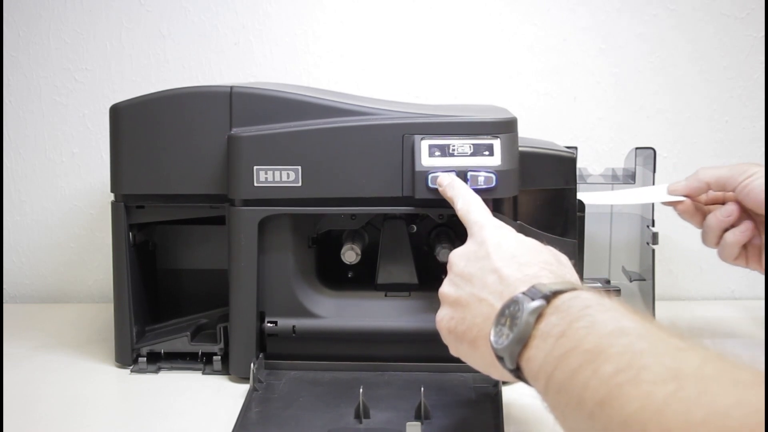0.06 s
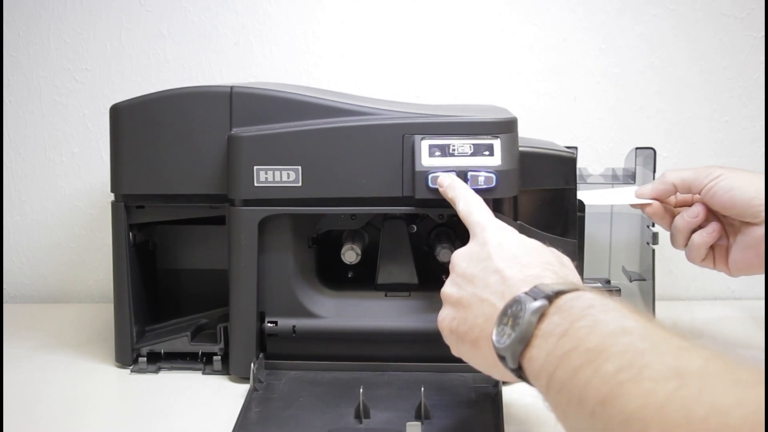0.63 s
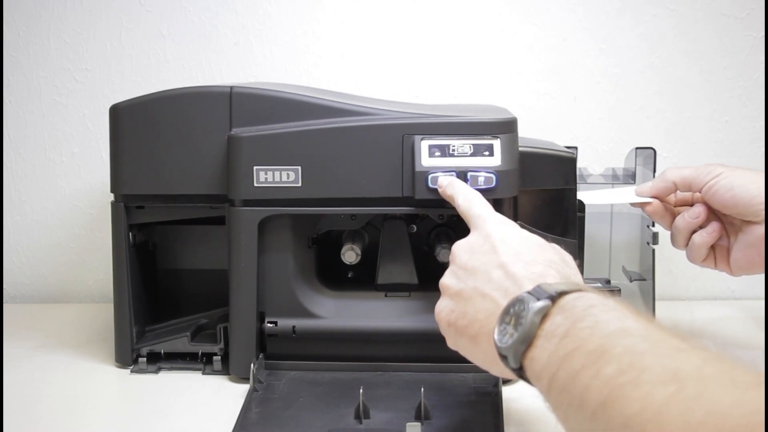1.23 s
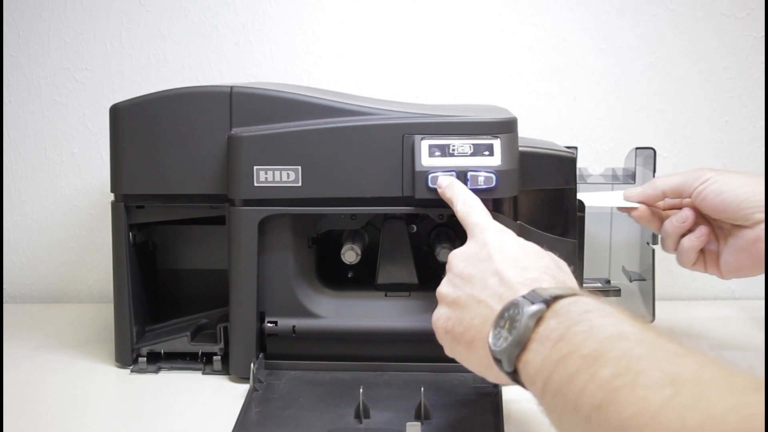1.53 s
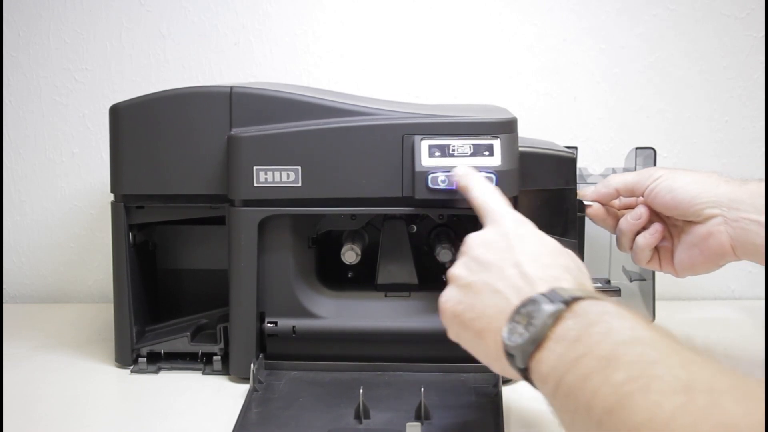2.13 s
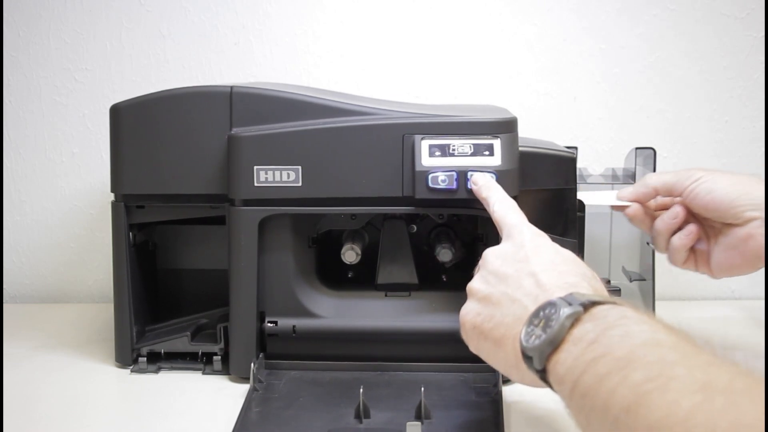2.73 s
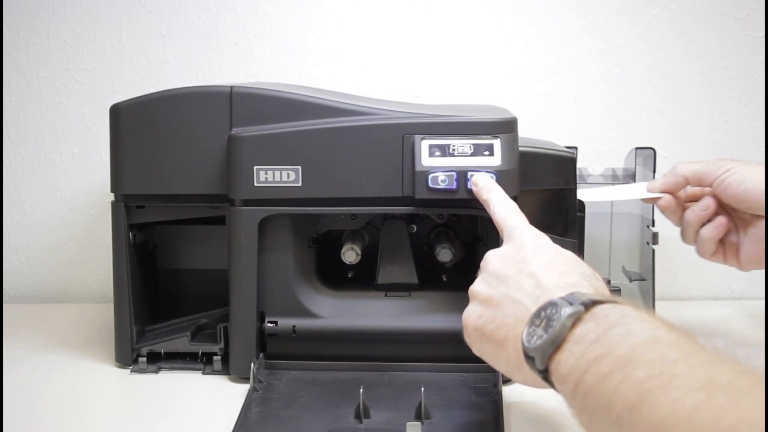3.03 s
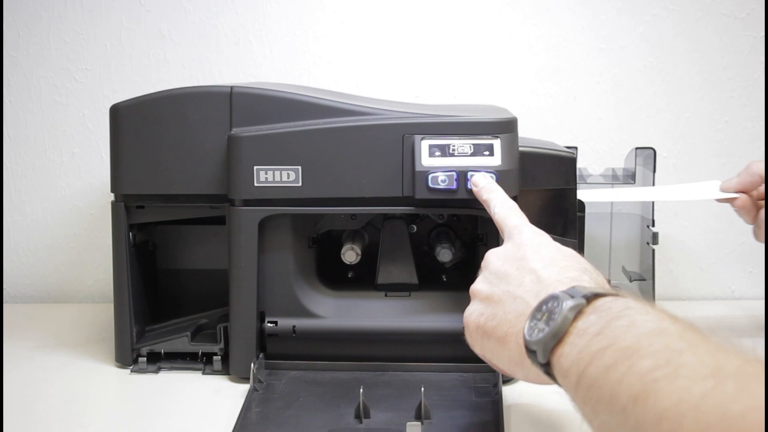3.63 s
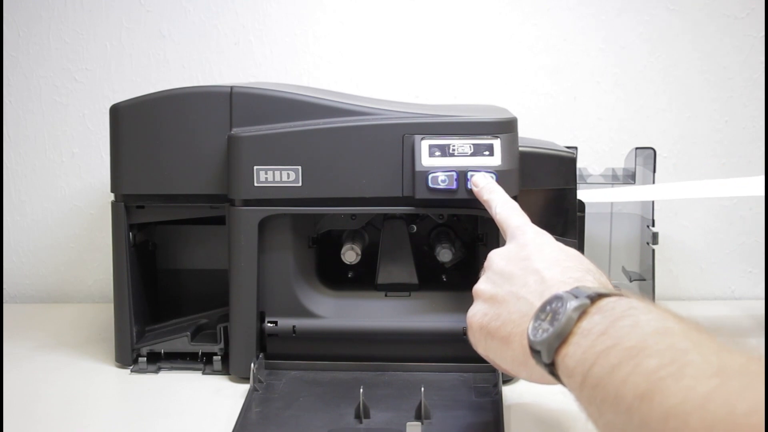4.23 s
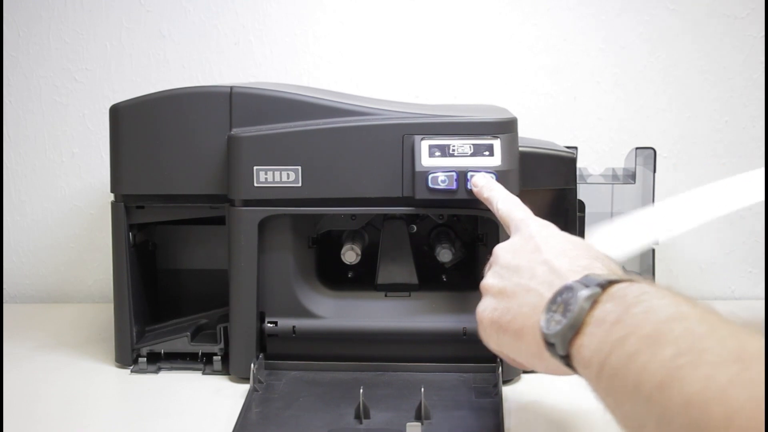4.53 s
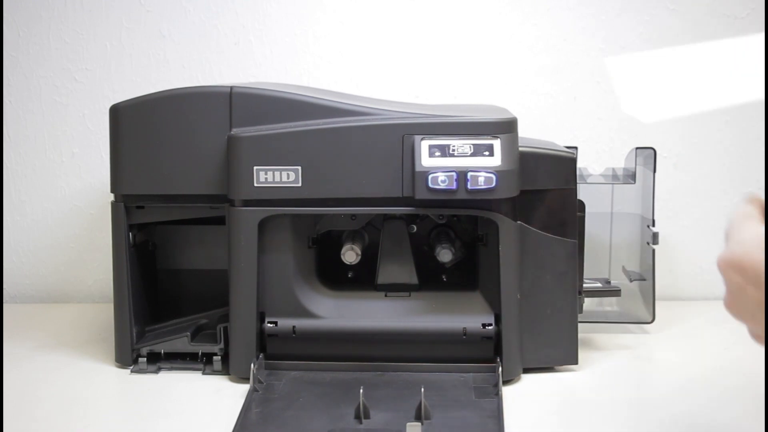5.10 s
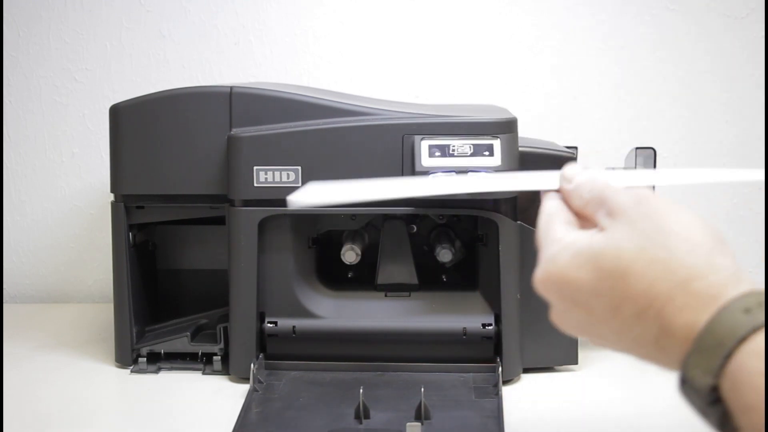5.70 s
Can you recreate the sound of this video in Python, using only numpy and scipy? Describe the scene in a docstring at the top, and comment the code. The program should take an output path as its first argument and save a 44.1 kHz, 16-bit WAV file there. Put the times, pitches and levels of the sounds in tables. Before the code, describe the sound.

A card printer's motor whines over churring gears in three short runs, with plastic clicks and a few knocks as the card comes out.

```python
"""A stepper motor whines over churring gears and rubbing rollers: a desktop card printer, close to the
microphone in a small quiet room. It feeds a cleaning card in three short runs, two inward and one
outward, with small clicks around the starts and stops. Each ramp of the motor shakes the plastic
housing and clatters the gears. At the end the card knocks free of the rollers and is lifted away."""
import sys
import numpy as np
from scipy import signal
from scipy.fft import rfft, irfft
from scipy.io import wavfile
from scipy.ndimage import uniform_filter1d

SR = 44100
rng = np.random.default_rng(int(sys.argv[2]) if len(sys.argv) > 2 else 0)


def dump(signal):
    """Clip the signal to [-1, 1] and save it as 16-bit WAV at the path in sys.argv[1]."""
    limited = np.clip(np.atleast_2d(signal).T, -1, 1)
    pcm = np.round(limited * 32767).astype(np.int16)
    wavfile.write(sys.argv[1], SR, pcm)


N = 254016
T = np.arange(N) / SR

FULL_STEP_HZ, FIRST_STEP_HZ = 2439, 520
# motor runs, the first already under way: start_s, stop_s, outward (0 or 1)
MOTOR_RUNS = [(-1, 1.087, 0), (1.325, 1.996, 0), (2.374, 4.524, 1)]


def amp(db):
    """Decibels to gain."""
    return 10 ** (np.asarray(db) / 20)


def unit(x):
    """Scale to rms 1."""
    return x / np.sqrt(np.mean(np.abs(x) ** 2) + 1e-20)


def walk(hz):
    """Smooth random drift at rms 1 that changes about hz times a second."""
    rolloff = np.exp(-(np.fft.rfftfreq(N, 1 / SR) / hz) ** 2)
    return unit(irfft(rfft(rng.standard_normal(N)) * rolloff, N))


def colour(x, points):
    """Filter x by a curve of (hz, db) points, at rms 1."""
    hz, db = np.transpose(points)
    curve_db = np.interp(np.log(np.fft.rfftfreq(N, 1 / SR) + 1), np.log(hz), db)
    return unit(irfft(rfft(x) * amp(curve_db), N))


def band(x, low_hz, high_hz):
    """Band-pass with 12 dB per octave skirts."""
    edges = [low_hz, min(max(high_hz, low_hz + 30), SR / 2 - 100)]
    return signal.sosfilt(signal.butter(2, edges, "band", fs=SR, output="sos"), x)


def convolve(x, response):
    """Pass x through a response scaled to energy 1."""
    return signal.fftconvolve(x, response / np.linalg.norm(response))[:N]


def grit(spread_db):
    """Dense tiny contacts of uneven size."""
    return unit(rng.standard_normal(N) * amp(spread_db * rng.standard_normal(N)))


def drive(ramp_s=.047):
    """Motor state: power on, speed 0-1 along short ramps, outward flag, steps taken."""
    on, speed, outward = np.zeros((3, N))
    for start, stop, direction in MOTOR_RUNS:
        inside = (T >= start) & (T < stop)
        on += inside
        speed += np.clip(np.minimum(T - start, stop - T) / ramp_s, 0, 1) ** 1.3
        outward += inside * direction
    steps = np.cumsum(on * (FIRST_STEP_HZ + (FULL_STEP_HZ - FIRST_STEP_HZ) * speed)) / SR
    return uniform_filter1d(on, size=220), speed, outward, steps


def whine(steps, outward, drag, waver_db=.8, surge_db=.7, flutter_rad=.16, drag_db=-1.5):
    """Trembling partials locked to the motor's steps; the step tone weakens when the card drags."""
    # each direction's partials, mostly multiples of the four-step coil cycle: pitch_hz, level_db
    inward_partials = [(1830, -84), (2250, -65.5), (2439, -50.5), (2627, -73), (4269, -74), (4877, -68.5),
                       (6099, -76.5), (6708, -81), (7316, -67.5), (7924, -79), (8538, -85), (9146, -76.5),
                       (9755, -74), (10368, -92), (10977, -88), (12193, -87), (13415, -98), (14023, -88),
                       (14632, -100), (15246, -83)]
    outward_partials = [(2035, -74), (2245, -104), (2439, -50), (2632, -80), (3138, -82), (3752, -87.5),
                        (4269, -68), (4877, -59), (5486, -80.5), (7316, -68.5), (7924, -86), (8538, -84),
                        (9146, -72), (9755, -75), (10368, -88), (10977, -93), (11585, -89), (13415, -89),
                        (14632, -85), (15246, -95)]
    # trim on the step tone's octave: time_s, gain_db
    octave_trim = [(1.66, -1), (1.72, -4), (3.2, -4.5), (3.55, -.5)]
    octave_db = np.interp(T, *np.transpose(octave_trim))
    out = 0
    for gate, partials in (1 - outward, inward_partials), (outward, outward_partials):
        for hz, db in partials:
            order = hz / FULL_STEP_HZ
            is_step, is_octave = abs(order - 1) < .02, abs(order - 2) < .02
            phase = 2 * np.pi * (steps * order + rng.random()) + flutter_rad * walk(27)
            tremble_db = waver_db * walk(40) + surge_db * walk(2.5)
            level_db = db + tremble_db + is_step * drag * drag_db + is_octave * octave_db
            out = out + gate * amp(level_db) * np.sqrt(2) * np.sin(phase)
    return out


def gears(steps, outward, drag, level_db=-50, outward_db=1.5, drag_db=1.2, blur_hz=17, tooth_steps=20):
    """Loose plastic teeth: blurred tones that follow the motor, and churr that pulses as they mesh."""
    # gear tones at full speed: pitch_hz, relative_db
    gear_tones = [(124, -66.5), (191, -67.5), (254, -66), (298, -60.5), (360, -75.5), (435, -63),
                  (492, -67.5), (570, -63.5), (610, -59), (733, -58.5), (855, -62), (980, -57), (1185, -63),
                  (1360, -67), (1520, -88), (2900, -82), (3400, -73.5), (3690, -77)]
    # spectrum of the churr: frequency_hz, relative_db
    churr_spectrum = [(120, -47), (230, -7), (450, 3), (620, 0), (1000, 2), (1300, -3.5), (1700, -8.5),
                      (2300, -9), (3000, -22.5), (6000, -27.5), (15000, -53)]
    turn = 2 * np.pi * steps / FULL_STEP_HZ
    tones = sum(amp(db) * (walk(blur_hz) * np.sin(hz * turn) + walk(blur_hz) * np.cos(hz * turn))
                for hz, db in gear_tones)
    mesh = 1 + .082 * np.cos(2 * np.pi * steps / tooth_steps)
    churr = colour(grit(4.7) * mesh, churr_spectrum) * amp(walk(39))
    gain = amp(level_db + outward * outward_db + drag * drag_db)
    return gain * (amp(1.9) * unit(tones) / 2 + amp(-2) * churr)


def rollers(speed, outward, drag, level_db=-62, outward_db=4, drag_db=4):
    """Rollers rub the card, louder on the way out and when it drags."""
    # spectrum of the rub: frequency_hz, relative_db
    rub_spectrum = [(600, -44), (1500, 4.5), (2600, 1.5), (3600, 0), (5200, -8), (7500, -12.5),
                    (10000, -16), (12000, -29), (15500, -75)]
    gain = np.sqrt(speed) * amp(level_db + outward * outward_db + drag * drag_db)
    return gain * colour(grit(7.5), rub_spectrum)


def room_tone(air_db=-63, rise_s=4.5, rise_db=1.5, hum_gain_db=1, hum_end_s=2.93, hum_fade_s=.088):
    """Soft air noise, slightly louder from 4.5 s on, and a low hum that ends partway."""
    # spectrum of the air: frequency_hz, relative_db
    air_spectrum = [(15, -36), (35, -2.5), (55, -6.5), (90, -12.5), (125, -11.5), (250, -7.5), (450, -12.5),
                    (750, -12), (1500, -19.5), (2200, -24), (5500, -28), (15500, -36.5)]
    # low hum: pitch_hz, base_level_db
    hum_tones = [(53.8, -65)]
    air = colour(rng.standard_normal(N), air_spectrum)
    air *= amp(air_db + (T > rise_s) * rise_db + .5 * walk(8.2))
    hum = sum(amp(db + 1.6 * walk(1.8)) * np.sqrt(2) * np.sin(2 * np.pi * (hz * T + rng.random()))
              for hz, db in hum_tones)
    return air + amp(hum_gain_db) * hum * np.clip((hum_end_s - T) / hum_fade_s + .5, 0, 1)


def room(x, wet_db=-8, t60_s=.22):
    """The dull, short tail of a small room, reaching the microphone 4 ms late."""
    t = T[:SR // 2]
    tail = rng.standard_normal(len(t)) * np.exp(-np.log(1000) * t / t60_s) * (t > .004)
    return amp(wet_db) * band(convolve(x, tail), 200, 3800)


def housing(x, crack_db=-3, crack_s=.0095):
    """Ring the case: its main modes and a brief crack of countless higher ones."""
    # modes of the plastic case: pitch_hz, relative_db, t60_s
    modes = [(310, 3, .07), (430, -2.5, 0.083), (608, 1, 0.13), (710, -3, 0.03), (862, 0.5, 0.072),
             (992, 4.5, 0.034), (1418, -1, 0.029), (1626, -4.5, 0.022), (1910, -5.5, 0.022),
             (2255, 1, 0.038), (2834, -8.5, 0.028), (3810, -0.5, 0.011), (4470, -25, 0.076),
             (5540, -22, 0.012)]
    t = T[:SR // 5]
    ring = sum(amp(db - 60 * t / t60) * np.sin(2 * np.pi * hz * t + rng.uniform(0, 2 * np.pi))
               for hz, db, t60 in modes)
    crack = rng.standard_normal(len(t)) * np.exp(-t / crack_s)
    return convolve(x, unit(ring) + amp(crack_db) * unit(crack))


def blow(start_s, db, low_hz, high_hz, chatter_s, end_share=.15, uneven_db=4):
    """A chatter of contacts tapering to end_share; harder, smaller parts ring the case higher up."""
    ring = housing(signal.unit_impulse(SR // 5), crack_db=3.5, crack_s=.007)[:SR // 5]
    count = int(chatter_s * SR) + 2
    force, size = rng.standard_normal((SR // 10, 2))[:count].T
    contacts = force * amp(uneven_db * size) * np.linspace(1, end_share, len(force))
    sound = band(signal.fftconvolve(ring, contacts), low_hz, high_hz)
    sound = sound * amp(db) / np.std(sound[:count + SR // 200])
    sound = signal.sosfilt(signal.butter(2, 8000, fs=SR, output="sos"), sound)  # plastic damps the top
    return np.pad(sound, (int(start_s * SR), N))[:N]


def case_clicks():
    """Small clicks and ticks in the case around the motor's starts and stops."""
    # clicks and ticks: start_s, level_db, low_hz, high_hz, chatter_s
    clicks = [(1.008, -53.5, 1200, 9000, 0.0034), (1.257, -49.5, 686, 1530, 0.01),
              (1.297, -52, 500, 2700, 0.016), (1.932, -45.5, 860, 2050, 0.014),
              (2.005, -52.5, 497, 3000, 0.011), (2.2968, -41.5, 570, 7360, 0.0024),
              (2.310, -55, 1000, 1830, .019), (2.349, -57, 300, 1300, .022)]
    return sum(blow(*click) for click in clicks)


def scatter(x, decay_s):
    """Many short paths through the case: a ragged response that dies quickly."""
    t = T[:SR // 10]
    return convolve(x, rng.standard_normal(len(t)) * np.exp(-t / decay_s))


def judder(on, speed, steps, swing_db=-41, octave_db=-53, rotor_hz=900, rattle_db=-46, uneven_db=4):
    """On the ramps the step tone sweeps through the rotor's resonance, and jerks rattle the case."""
    slow = on * (1 - speed)
    ramping = on * np.minimum(10 * slow, 1)
    step_hz = FIRST_STEP_HZ + (FULL_STEP_HZ - FIRST_STEP_HZ) * speed
    phase = 2 * np.pi * steps + .8 * walk(300)
    resonance = 1 / np.hypot(1, 2 * (step_hz / rotor_hz - rotor_hz / step_hz))
    swing = amp(swing_db) * resonance * np.sin(phase)
    octave = amp(octave_db) * np.sqrt(speed) * np.sin(2 * phase)
    jerks = np.diff(np.floor(steps), prepend=0) * slow * amp(uneven_db * rng.standard_normal(N))
    rattle = amp(rattle_db) * unit(housing(band(jerks, 730, 4050))) * np.sqrt(np.mean(slow))
    sweep = scatter(ramping * (swing + octave), decay_s=.0044)
    return band(band(sweep, 270, 6100), 270, 6100) + rattle


def backlash(start_db=-40.5, outward_db=-4.5, stop_db=-44.5, start_chatter_s=.026, stop_chatter_s=.021):
    """Gear teeth clatter as they take up slack at each start, and more dully as the motor brakes."""
    out = 0
    for start, stop, outward in MOTOR_RUNS:
        if start > 0:
            db = start_db + outward * outward_db
            out += blow(start, db, 376, 3360, start_chatter_s, end_share=1)
        out += blow(stop - stop_chatter_s, stop_db, 630, 1510, stop_chatter_s, end_share=1)
    return out


def swishes_and_bumps():
    """The card swishes over rollers and fingers. Soft low bumps, then a long faint background rumble."""
    # swells of band noise: peak_s, level_db, centre_hz, half_width_s
    swishes = [(3.308, -63, 9800, .016), (3.518, -62.5, 9500, .02), (4.03, -59, 3360, 0.033),
               (4.356, -48.5, 720, 0.17), (5.587, -68.5, 3850, .012), (5.73, -75, 6000, .09)]
    bumps_and_rumble = [(3.527, -60, 48.5, 0.068), (4.22, -56.5, 45.3, 0.072), (4.572, -59, 62, 0.04),
                        (4.595, -58, 150, 0.085), (4.66, -59.5, 55.5, 0.11), (5.2, -70.5, 56, 1),
                        (5.195, -68, 117, 1)]
    out = 0
    for peak_s, db, hz, half_width_s in swishes + bumps_and_rumble:
        edges_hz = hz * .72, hz * 1.23
        noise = band(band(grit(2.1), *edges_hz), *edges_hz)
        out += amp(db) * np.exp(-((T - peak_s) / half_width_s) ** 2) * unit(noise)
    return out


def card_knocks():
    """The card knocks against rollers and case on its way out."""
    # knocks: start_s, level_db, low_hz, high_hz, chatter_s
    knocks = [(3.937, -50, 2020, 4500, .005), (3.954, -36.5, 1370, 4160, 0.012),
              (4.388, -36, 590, 5100, 0.0078), (4.409, -42, 397, 920, 0.01),
              (4.426, -48.5, 2820, 6700, 0.017), (4.434, -39, 450, 2980, 0.027),
              (4.892, -62.5, 2170, 3630, 0.005)]
    return sum(blow(*knock) for knock in knocks)


def scene(drag_start_s=3.95, drag_rise_s=.044, whine_send_db=-9):
    """The printer close to one microphone, with the small room behind it."""
    on, speed, outward, steps = drive()
    # near the end of its travel the card snaps off a roller and drags
    drag = np.clip((T - drag_start_s) / drag_rise_s, 0, 1)
    cruise = on * speed ** 5  # the whine only rings clean near full speed
    motor = cruise * whine(steps, outward, drag)
    feed = on * (gears(steps, outward, drag) + rollers(speed, outward, drag))
    body = feed + judder(on, speed, steps) + backlash()
    body += case_clicks() + card_knocks() + swishes_and_bumps()
    reverb = room(body + amp(whine_send_db) * motor)
    return (motor + body + reverb + room_tone())[None]


def record(dry, top_hz=15750):
    """The microphone signal, cut steeply at the top."""
    return signal.sosfilt(signal.ellip(10, .1, 70, top_hz, fs=SR, output="sos"), dry)


dry = scene()
out = record(dry)
dump(out)
```